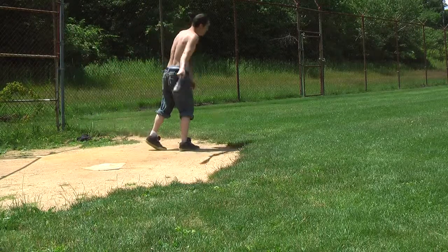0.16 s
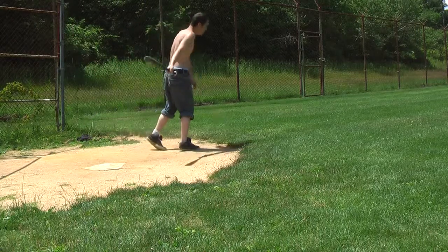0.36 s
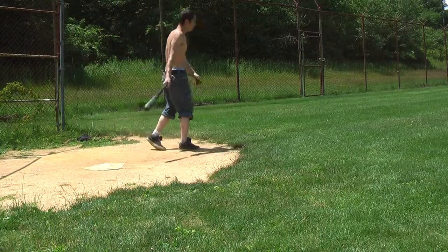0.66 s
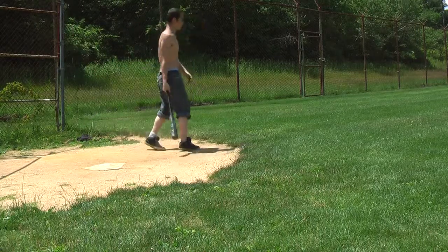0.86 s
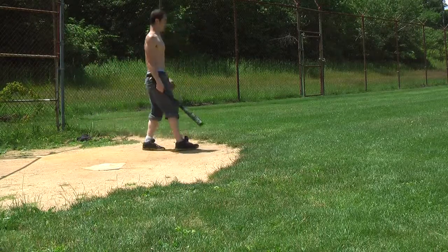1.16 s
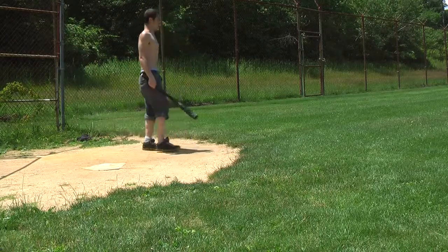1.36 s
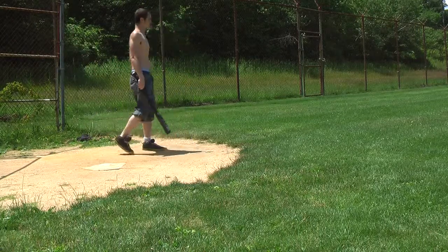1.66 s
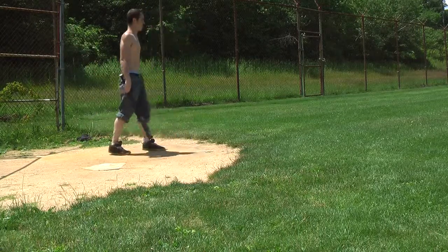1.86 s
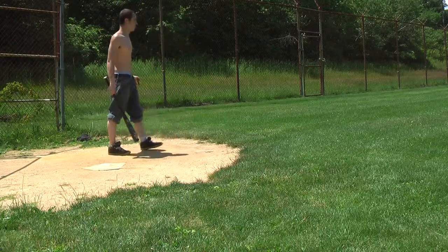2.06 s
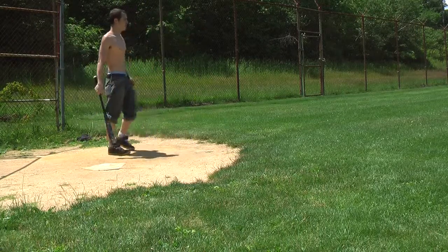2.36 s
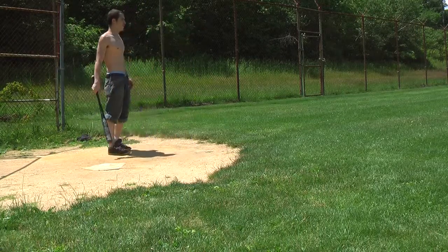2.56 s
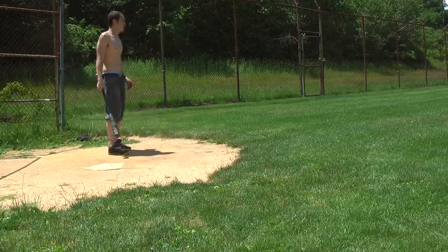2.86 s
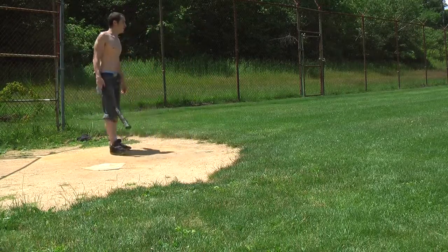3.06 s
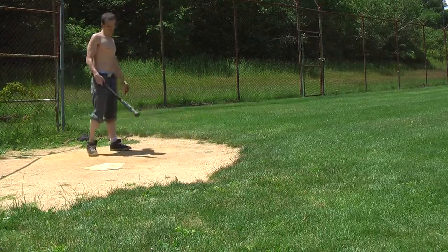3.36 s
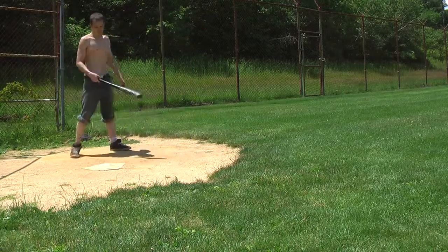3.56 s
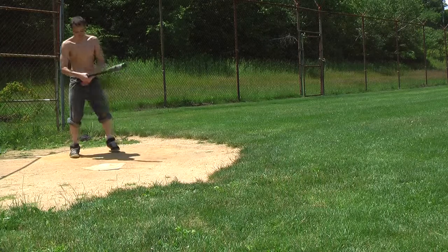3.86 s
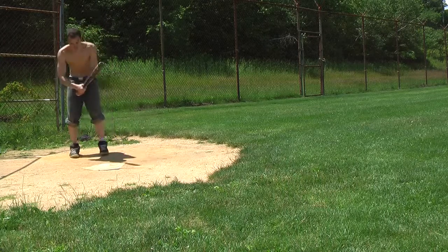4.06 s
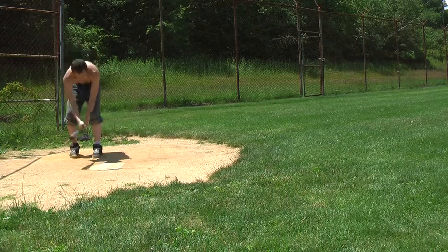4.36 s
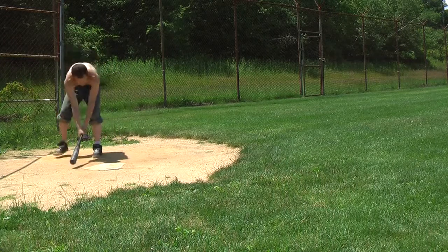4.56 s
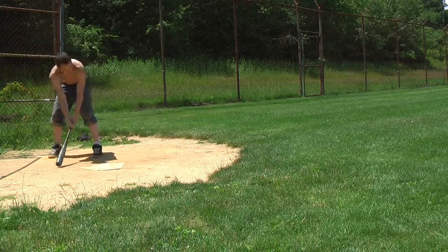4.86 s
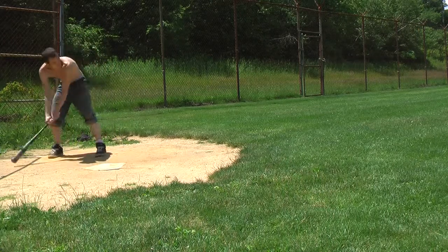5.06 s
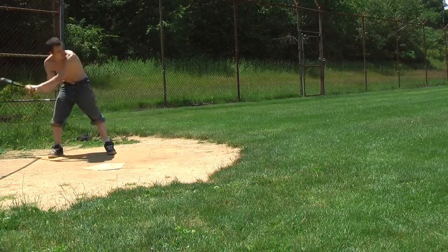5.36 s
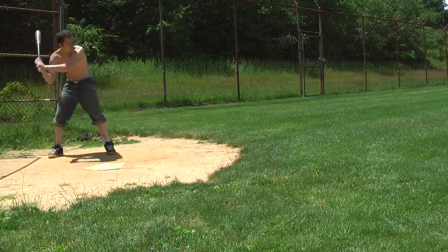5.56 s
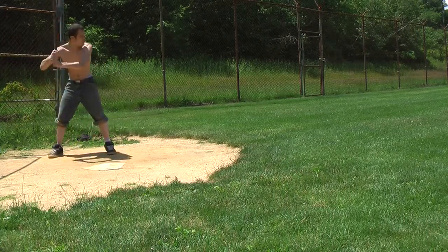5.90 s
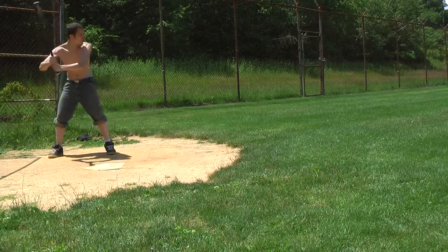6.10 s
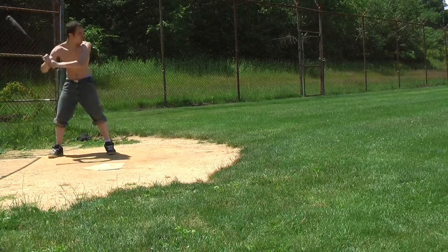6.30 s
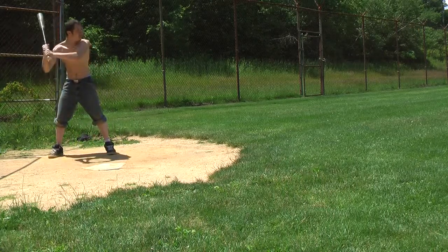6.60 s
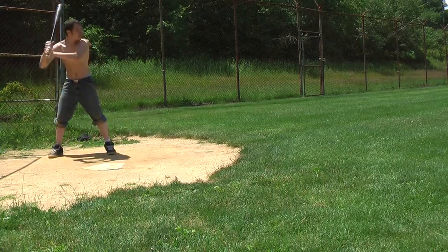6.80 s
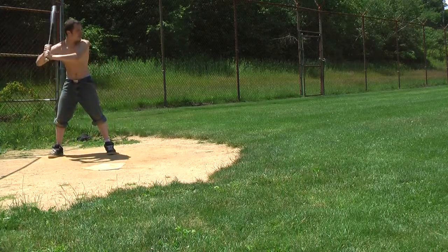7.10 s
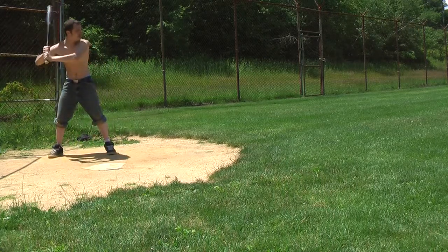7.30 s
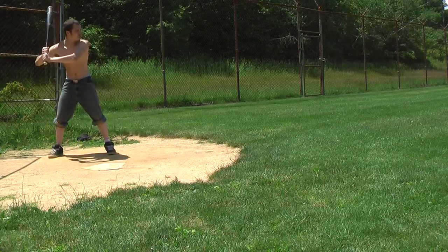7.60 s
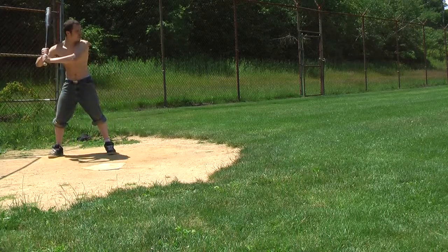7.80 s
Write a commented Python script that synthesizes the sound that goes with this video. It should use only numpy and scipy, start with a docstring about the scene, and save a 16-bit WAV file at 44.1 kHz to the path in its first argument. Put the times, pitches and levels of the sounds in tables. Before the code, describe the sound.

Birds whistle short sliding phrases over a hushed field with faint traffic; shoes scuff dirt, then a metal bat knocks the ground once, hard.

```python
"""A quiet ball field edged by woods. Birds whistle short phrases as sliding sines with woodland tails:
a far one on the left, a soft one ahead, a nearer one on the right, and a small one chips.
A batter's shoes step and scrape on the dirt (shaped noise); his metal bat knocks the ground (damped modes).
Dry clicks are filtered noise bursts. Far traffic rumbles (noise), engines drone (sines), leaves and hiss lie under."""
import sys
import numpy as np
from scipy import signal
from scipy.fft import rfft, irfft, next_fast_len
from scipy.io import wavfile
from scipy.ndimage import map_coordinates

SR = 44100
rng = np.random.default_rng(int(sys.argv[2]) if len(sys.argv) > 2 else 0)


def dump_mix(stems):
    """Bounce the given channels to the path in sys.argv[1] as a 16-bit WAV at rate SR."""
    frames = np.atleast_2d(stems).T  # one column per channel
    limited = np.clip(frames, -1, 1)  # hard clip at full scale
    pcm = np.round(limited * 32767).astype(np.int16)
    wavfile.write(sys.argv[1], SR, pcm)


N = 350154

# Bird notes, levels before placing: (start [s], length [s], start pitch [Hz], end pitch [Hz], arch [Hz], level [dB])
NEAR_WHISTLES = [(4.846, .156, 2720, 2740, 810, -47.5), (5.0, 0.024, 2710, 2660, 545, -48),
                 (5.019, 0.023, 2670, 2690, 522, -53), (5.27, 0.081, 3320, 3370, -430, -52.5),
                 (5.348, 0.032, 3450, 2310, 194, -56), (5.547, 0.057, 3860, 3620, -170, -50.5),
                 (5.588, .062, 3720, 2780, -68, -50), (5.832, .075, 3560, 2845, 261, -49),
                 (6.262, 0.14, 2960, 2890, 349.5, -50.5), (6.66, .17, 3530, 2560, -52, -52.5)]
NEAR_BUZZES = [(5.9, .1, 3130, 2630, -2, -53.5), (6.388, .065, 2990, 4130, 121, -53)]
FAR_WHISTLES = [(.135, .04, 3330, 2690, 0, -66), (.19, 0.039, 2850, 2680, 0, -70),
                (.262, .1, 3326, 2706, 350.5, -58.5), (.755, 0.084, 3150, 2240, 290, -59.5),
                (.865, 0.057, 3176, 2520, 4, -60), (1.062, .05, 3280, 2980, 0, -61),
                (1.25, 0.081, 3630, 2780, 129, -61), (1.32, 0.048, 2943, 2777, -41, -55.5),
                (1.535, 0.085, 2855, 2525, 2, -58.5), (1.605, 0.09, 2780, 2650, 274, -57),
                (1.695, 0.063, 2640, 2804, 2, -58), (1.935, 0.16, 3050, 2890, 360.5, -56),
                (2.09, .075, 3170, 4000, 0, -62.5), (2.385, 0.044, 3190, 2894, 42, -55.5),
                (2.45, 0.081, 3180, 2607, 4, -58), (2.72, 0.13, 3796, 2620, -62, -55),
                (2.85, .065, 2720, 2110, 0, -61), (3.18, 0.053, 2720, 2550, 2, -60.5),
                (3.24, 0.09, 2770, 3200, -150, -64)]
MIDDLE_WHISTLES = [(.95, .1, 2740, 2406, -48, -57), (2.215, 0.042, 3260, 2360, 3, -57.5),
                   (2.27, .065, 1950, 2170, 30, -67), (2.355, 0.048, 2720, 2450, -30, -57),
                   (6.9, .12, 3180, 2450, -100, -64), (7.05, 0.09, 3310, 2750, -3, -60.5),
                   (7.6, .035, 3350, 2500, 200, -63), (7.63, .035, 2550, 3300, 397, -66),
                   (7.675, 0.039, 2520, 2500, 0, -63.5)]
CHIPS = [(5.279, .035, 4750, 4450, -200, -70), (5.607, .04, 4680, 4000, 250, -64),
         (5.67, .027, 5450, 5070, 0, -69), (5.76, .045, 4380, 4300, 334, -66.5),
         (6.112, 0.052, 5120, 4300, 2, -70), (6.18, 0.029, 3700, 3980, 2, -68),
         (6.397, .04, 5050, 4700, 60, -68), (6.493, 0.038, 5650, 6070, 0, -67)]
FLAT_TOP_HZ = 494  # this much arch adds 1 to the arch exponent: taller arches have flatter tops

# Bat contacts with the ground: (time [s], thud [dB], thud tilt [dB/octave], ring [dB], crack [dB])
BAT_BLOWS = [(4.5462, -4, 1.5, -28.5, -32), (4.5641, -22.5, 11, -39.5, -46), (4.7216, -30, -4, -75, -39)]
# Modes of the packed earth and of the barrel: (frequency [Hz], level [dB], t60 [s])
GROUND_MODES = [(78, -15.5, 0.16), (125, -8, 0.067), (289, -2, 0.036), (338, 0.5, 0.03), (391, 0.5, 0.028),
                (690, -2.5, 0.021), (967, -18.5, 0.022)]
BAT_MODES = [(1290, -1, 0.041), (1630, -1, 0.025), (2070, -2, 0.026), (2350, -8.5, 0.051),
             (2846, -3.5, 0.036), (3100, -15, .07), (3360, -16.5, 0.12), (3740, -7, 0.045),
             (4860, -19, .055), (6100, -19, 0.05)]
# Spectrum of the crack: (frequency [Hz], level [dB])
CRACK_SPECTRUM = [(200, -8), (700, 8), (1500, -6), (3800, 0), (5000, -3.5), (11000, -5.5), (16000, -9)]

# Shoes on dirt: (time of peak [s], rise sigma [s], fall sigma [s], grit [dB], sole [dB])
STEPS = [(.615, 0.0033, 0.015, -59, -56.5), (1.15, 0.053, 0.043, -58.5, -52.5),
         (1.805, 0.014, 0.014, -56.5, -61), (1.9, 0.02, 0.018, -64, -68), (2.525, 0.02, 0.028, -54.5, -52),
         (3.455, 0.015, 0.009, -55.5, -50.5), (3.68, 0.038, .03, -53.5, -57),
         (3.855, 0.013, .018, -53.5, -55), (4.265, 0.0044, 0.022, -48, -47.5),
         (4.86, 0.016, 0.013, -54.5, -72), (5.1, 0.023, 0.018, -62, -55), (5.5, 0.12, 0.16, -60.5, -62)]
# Spectra of grit and sole: (frequency [Hz], level [dB])
GRIT_SPECTRUM = [(400, -24), (1200, 2), (2500, 4.5), (5000, -1), (9000, -12.5), (15000, -14)]
SOLE_SPECTRUM = [(100, -27), (250, 2), (550, 0), (1300, -7.5), (2500, -12), (6000, -36)]
# Shoe drag: (time [s], rub [dB], resonance [Hz], resonance [dB])
SCRAPE_PATH = [(3.22, -83, 2820, -70), (3.35, -55.5, 2626, -59), (3.48, -53, 2400, -55),
               (3.62, -55.5, 2294, -58.5), (3.72, -56.5, 1847, -57), (3.86, -65, 1750, -53),
               (3.94, -73, 1750, -66), (4.08, -60.5, 1800, -55.5), (4.27, -82, 1790, -64)]
# Spectrum of the rub: (frequency [Hz], level [dB])
RUB_SPECTRUM = [(500, -24), (1200, -7), (1700, 2.5), (2800, -7), (3180, 7.5), (3600, -5.5), (5500, -8),
                (7400, -11.5), (8000, -4.5), (8700, -10), (11000, -15), (15000, -23)]

# Sharp clicks: (time [s], level [dB], centre [Hz], width [octaves])
CLICKS = [(.455, -48, 5000, 0.57), (0.614, -40.5, 3500, 0.84), (.633, -48, 5000, 1),
          (2.146, -32.5, 1400, 0.41), (4.2623, -38.5, 3500, 1.8), (4.338, -55, 6000, 1),
          (4.741, -43, 5890, 1.3), (4.867, -43, 7900, 0.85), (7.5498, -23.5, 6000, 0.79),
          (7.863, -50, 7800, 1.5)]
# Their ringing: (frequency [Hz], level [dB], t60 [s])
CLICK_MODES = [(1780, 2, 0.057), (5540, -3, 0.066), (9830, 0, 0.048)]
# Their treble roll-off: (frequency [Hz], gain [dB])
CLICK_TREBLE = [(9500, -3), (12000, -7), (16000, -11)]

# Far engine: (time [s], level [dB])
ENGINE_LEVEL = [(3.2, -57), (3.45, -44.5), (4.3, -43), (4.9, -45.5), (5.7, -53.5), (6.1, -49), (6.5, -52.5),
                (7.94, -48.5)]
ENGINE_HZ, ENGINE_RISE_HZ_PER_S, ENGINE_FADE_S = 133.2, 3.95, 0.12  # it gains speed steadily
# Other vehicles: (start [s], length [s], start pitch [Hz], end pitch [Hz], arch [Hz], level [dB])
DRONES = [(0, 3.9, 41, 39.9, -0.5, -61.5), (2.0, .9, 161, 160.2, 1.5, -49.5), (3.55, 1.1, 89, 92.6, 3, -51),
          (4.65, 0.83, 95, 102.6, 3, -44), (5.9, 1.11, 211.7, 205, 0, -52.5),
          (6.3, 1.7, 64.2, 64.2, 0.5, -58.5)]
# Spectra of road rumble, leaves and hiss: (frequency [Hz], level [dB])
RUMBLE_SPECTRUM = [(13, -36), (22, -23), (48, -5.5), (97, 0), (124, -1), (152, -0.5), (182, -1.5),
                   (252, -5), (322, -16.5), (348, -20), (376, -20.5), (480, -20), (620, -60), (1060, -120)]
LEAVES_SPECTRUM = [(190, -21), (330, -3), (398, -7), (461, -3.5), (533, -4.5), (817, -3.5), (1870, -14),
                   (2140, -16), (2790, -13), (3450, -16.5), (8000, -29.5), (10400, -51), (17600, -120)]
HISS_SPECTRUM = [(2000, -24), (6000, -23), (8700, -0.5), (9300, 4), (12000, 1.5), (14300, 4.5), (15700, 0)]
# Left-right correlation of rumble and leaves: (frequency [Hz], correlation [0-1])
BACKGROUND_CORRELATION = [(100, 1), (300, 0.99), (600, 0.077), (1200, 0.04), (3000, 0.033), (6000, 0.068),
                          (10000, 0.1)]
RUMBLE_DB, LEAVES_DB, HISS_DB = -45, -55, -69.5
TOP_HZ = 15800


def amp(db):
    """Decibels to gain."""
    return 10 ** (np.asarray(db) / 20)


def unit(x):
    """Scale to rms 1."""
    return x / np.sqrt(np.mean(x ** 2) + 1e-20)


def along(points, hz):
    """(Hz, value) points interpolated on a log-frequency axis."""
    f, v = np.transpose(points)
    return np.interp(np.log(hz + 1), np.log(f + 1), v)


def clock():
    """Time of every sample [s]."""
    return np.arange(N) / SR


def curves(rows):
    """One interpolated curve for each column after the time."""
    s, *cols = np.transpose(rows)
    return [np.interp(clock(), s, c) for c in cols]


def wobble(rate_hz, size):
    """Smooth random curve through rate_hz normal-distributed knots a second."""
    knots = rng.standard_normal(int(size * rate_hz / SR) + 4)
    return map_coordinates(knots, [np.arange(size) * rate_hz / SR])


def filtered(x, response):
    """Multiply the spectrum of x by response(hz)."""
    size = x.shape[-1]
    padded = next_fast_len(size + 8192)
    spectrum = rfft(x, padded) * response(np.fft.rfftfreq(padded, 1 / SR))
    return irfft(spectrum, padded)[..., :size]


def noise(spectrum, correlation, size):
    """Coloured stereo noise of rms 1; the mid/side balance sets the left-right correlation."""
    def mid_side_gains(hz):
        angle = np.arccos(np.clip(along(correlation, hz), -1, 1)) / 2
        return amp(along(spectrum, hz)) * [np.cos(angle), np.sin(angle)]
    mid, side = filtered(rng.standard_normal((2, size)), mid_side_gains)
    return unit(np.array([mid + side, mid - side]))


def pan(left_db):
    """Channel gains with the left left_db above the right."""
    return amp([[left_db / 2], [-left_db / 2]])


def placed(x, left_db, lead_ms):
    """Place a source by level difference and by the left channel's lead in time."""
    def shift(hz):
        return np.exp(1j * np.pi * hz * lead_ms / 1000 * np.array([[1], [-1]]))
    return pan(left_db) * filtered(x, shift)


def add(track, s, x):
    """Mix x into the track from time s."""
    start = max(round(s * SR), 0)
    part = track[..., start:start + x.shape[-1]]
    part += x[..., :part.shape[-1]]


def fade(t, t60_s):
    """Exponential decay, -60 dB at t60_s."""
    return np.exp(-np.log(1000) * t / t60_s)


def ring(modes, t):
    """Sum of damped sines."""
    return sum(amp(db) * fade(t, t60_s) * np.sin(2 * np.pi * hz * t) for hz, db, t60_s in modes)


def woods(x, t60_s, onset_s):
    """Trunks and leaves scatter a sound into a diffuse tail: decaying noise with a soft onset."""
    t = np.arange(SR) / SR
    tail = rng.standard_normal((2, SR)) * fade(t, t60_s) * (1 - np.exp(-t / onset_s))
    return signal.fftconvolve(x[None], tail / np.linalg.norm(tail[0]), axes=1)[:, :N]


def slurs(notes, rise_share, fall_share, swell_db, waver, flutter_db, rate_hz):
    """Sines sliding along a pitch arch; level drifts by swell_db per note, pitch and level wobble at random."""
    out = np.zeros(N)
    for s, length_s, start_hz, end_hz, arch_hz, db in notes:
        t = np.arange(0, length_s, 1 / SR)
        u = t / length_s
        arch = 1 - np.abs(2 * u - 1) ** (2 + abs(arch_hz) / FLAT_TOP_HZ)
        glide_hz = start_hz + (end_hz - start_hz) * u + arch_hz * arch
        pitch_hz = glide_hz * (1 + waver * wobble(rate_hz, len(t)))
        gate = np.clip(np.minimum(u / rise_share, (1 - u) / fall_share), 0, 1)
        level = amp(db + swell_db * (u - .5) + flutter_db * wobble(rate_hz, len(t)))
        tone = np.sqrt(2) * np.sin(2 * np.pi * np.cumsum(pitch_hz) / SR)  # rms 1
        add(out, s, gate * level * tone)
    return out


def near_bird():
    """Clean whistles and fast-warbled buzzes with a faint answer from the trees."""
    whistles = slurs(NEAR_WHISTLES, rise_share=.19, fall_share=.07, swell_db=.5,
                     waver=.0058, flutter_db=2, rate_hz=123.5)
    buzzes = slurs(NEAR_BUZZES, rise_share=.086, fall_share=.25, swell_db=-9,
                   waver=.066, flutter_db=2, rate_hz=550)
    song = whistles + buzzes
    direct = amp(-5) * placed(song, left_db=-15, lead_ms=.13)
    return direct + amp(-7.5) * pan(2.3) * woods(song, t60_s=.91, onset_s=.0087)


def far_bird():
    """Whistles from deep in the trees: nearby leaves blur them and the woods add a tail."""
    song = slurs(FAR_WHISTLES, rise_share=.24, fall_share=.12, swell_db=3,
                 waver=.014, flutter_db=1.5, rate_hz=200)
    blur = amp(-5) * woods(song, t60_s=.2, onset_s=.0043)
    tail = amp(-2) * woods(song, t60_s=.92, onset_s=.015)
    return amp(-5) * placed(song, left_db=16, lead_ms=.11) + pan(12.3) * (blur + tail)


def middle_bird():
    """Soft whistles from the tree line ahead, blurred by a short scattered tail."""
    song = slurs(MIDDLE_WHISTLES, rise_share=.15, fall_share=.15, swell_db=-2,
                 waver=.014, flutter_db=2.2, rate_hz=163)
    direct = amp(-4) * placed(song, left_db=-3, lead_ms=-.05)
    return direct + amp(-2.5) * woods(song, t60_s=.35, onset_s=.0034)


def chipping_bird():
    """Thin, short, high slurs on the right with a weak scattered tail."""
    song = slurs(CHIPS, rise_share=.2, fall_share=.2, swell_db=.3,
                 waver=.0087, flutter_db=2.5, rate_hz=156)
    return amp(-5) * pan(-12) * song + amp(-10) * woods(song, t60_s=.35, onset_s=.01)


def bat():
    """The barrel excites damped earth modes, its own brief ring and a noise crack, then touches again more weakly."""
    out, t = np.zeros((2, N)), np.arange(SR // 3) / SR
    for s, thud_db, tilt_db, ring_db, crack_db in BAT_BLOWS:
        earth = [(hz, db + tilt_db * np.log2(hz / 400), t60_s) for hz, db, t60_s in GROUND_MODES]
        thud = ring(earth, t) * (1 - np.exp(-t / .0023)) ** 2  # the soil gives way before it pushes back
        decay = fade(t, .02) + amp(-16.5) * fade(t, .16)
        crack = noise(CRACK_SPECTRUM, [(500, .56), (4000, .74)], len(t)) * decay
        metal = amp(ring_db) * ring(BAT_MODES, t) + amp(crack_db) * crack
        add(out, s, amp(thud_db) * pan(.85) * thud + pan(3.7) * metal)
    return out + amp(-32.5) * woods(out[0], t60_s=.56, onset_s=.03)


def shoes():
    """Each step crushes grit, a grainy noise, under a softer, lower push of the sole."""
    t, grit, sole = clock(), np.zeros(N), np.zeros(N)
    for s, rise_s, fall_s, grit_db, sole_db in STEPS:
        press = np.exp(-.5 * ((t - s) / np.where(t < s, rise_s, fall_s)) ** 2)
        grit += amp(grit_db) * press
        sole += amp(sole_db) * press
    grains = unit(amp(3.3 * wobble(700, N)))
    crush = grit * noise(GRIT_SPECTRUM, [(1000, .56), (9000, 1)], N)
    push = sole * noise(SOLE_SPECTRUM, [(500, .71)], N)
    return pan(2.2) * grains * (crush + push)


def scrape():
    """A shoe drags over the dirt: rubbing noise plus a narrow noise band whose centre mostly sinks."""
    db, hz, resonance_db = curves(SCRAPE_PATH)
    mid, side = filtered(rng.standard_normal((2, N)), lambda f: 1 / (1 + (f / 200) ** 2))
    slow_noise = np.array([mid + .5 * side, mid - .5 * side])
    resonance = unit(slow_noise * np.sin(2 * np.pi * np.cumsum(hz) / SR))  # shifted up to hz
    rub = noise(RUB_SPECTRUM, [(1400, .95), (7000, .89), (14000, 1)], N) * amp(.79 * wobble(200, N))
    sliding = (clock() > SCRAPE_PATH[0][0]) & (clock() < SCRAPE_PATH[-1][0])
    return pan(2.2) * sliding * (amp(db) * rub + amp(resonance_db) * resonance)


def clicks():
    """Dry close ticks: band-shaped noise bursts with a little body and a trace of ringing."""
    out, t = np.zeros((2, N)), np.arange(SR // 8) / SR
    hz = np.geomspace(100, 16000, 30)
    for s, db, centre_hz, width_oct in CLICKS:
        band = 1 / np.sqrt(1 + (np.log2(hz / centre_hz) / width_oct) ** 4)
        band = band + amp(-6.5) * (hz < centre_hz)  # body
        colour = np.transpose([hz, 20 * np.log10(band) + along(CLICK_TREBLE, hz)])
        snap = noise(colour, [(3000, .66)], len(t)) * fade(t, .012) * (1 - np.exp(-t / .00051))
        add(out, s, amp(db) * pan(1.1) * (snap + amp(-26) * ring(CLICK_MODES, t)))
    return out


def traffic():
    """Far engines, wavering sines, drone over the noise rumble of a road."""
    running_s = clock() - ENGINE_LEVEL[0][0]
    hz = (ENGINE_HZ + ENGINE_RISE_HZ_PER_S * running_s) * (1 + .0084 * wobble(9.8, N))
    fade_in = np.clip(running_s / ENGINE_FADE_S, 0, 1)
    level = fade_in * amp(curves(ENGINE_LEVEL)[0] + 2.3 * wobble(9.8, N))
    engine = np.sqrt(2) * level * np.sin(2 * np.pi * np.cumsum(hz) / SR)
    others = slurs(DRONES, rise_share=.23, fall_share=.29, swell_db=-3,
                   waver=.012, flutter_db=3.5, rate_hz=10)
    rumble = amp(RUMBLE_DB + .71 * wobble(8, N)) * noise(RUMBLE_SPECTRUM, BACKGROUND_CORRELATION, N)
    return engine + others + rumble


def air():
    """Leaves stir as slowly wavering noise above the microphone's own steady hiss."""
    leaves = amp(LEAVES_DB + 1.1 * wobble(5.4, N)) * noise(LEAVES_SPECTRUM, BACKGROUND_CORRELATION, N)
    hiss = amp(HISS_DB) * noise(HISS_SPECTRUM, [(5000, .15), (9500, 1)], N)
    return leaves + hiss


def scene():
    """Sum of all sources on the field."""
    birds = near_bird() + far_bird() + middle_bird() + chipping_bird()
    batter = bat() + shoes() + scrape()
    return birds + batter + clicks() + traffic() + air()


def record(dry):
    """Brick-wall low-pass at TOP_HZ."""
    return filtered(dry, lambda hz: hz < TOP_HZ)


dry = scene()
out = record(dry)
dump_mix(out)
```